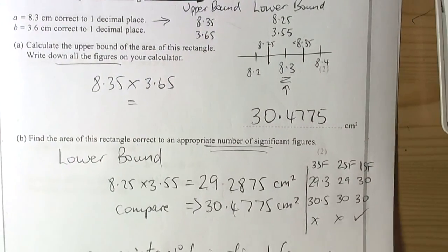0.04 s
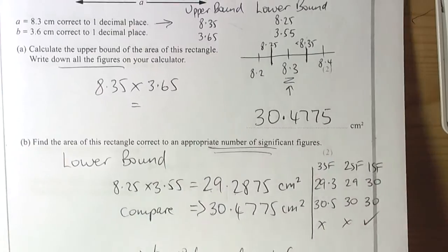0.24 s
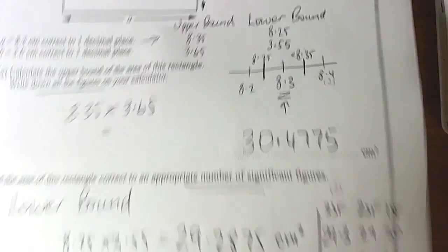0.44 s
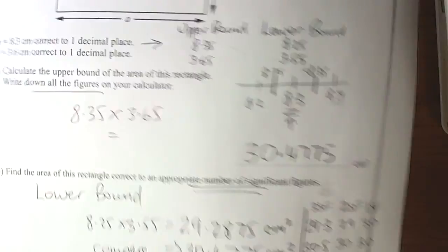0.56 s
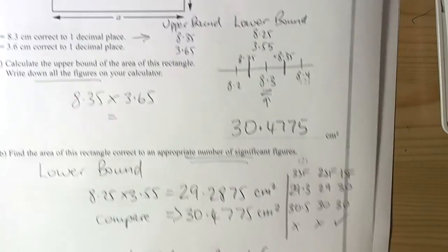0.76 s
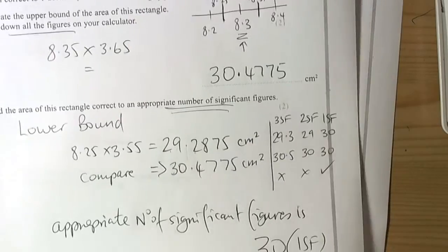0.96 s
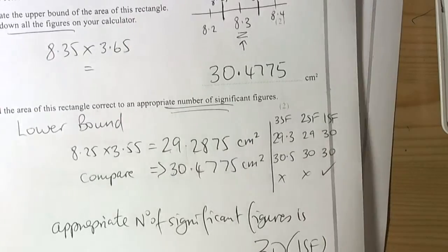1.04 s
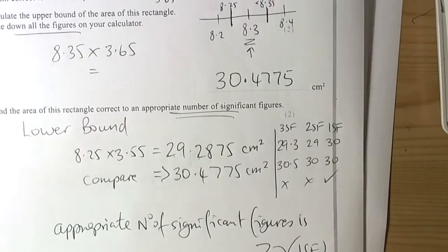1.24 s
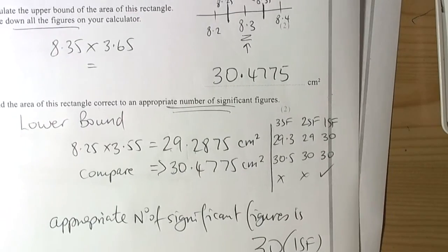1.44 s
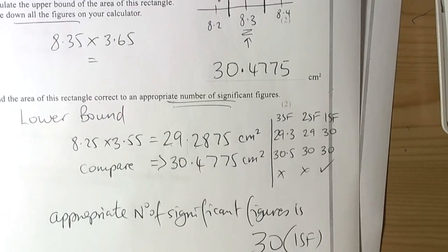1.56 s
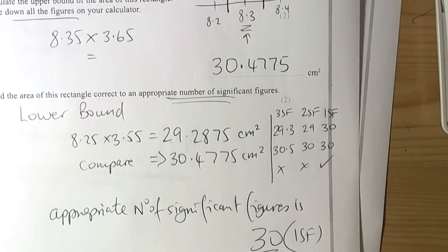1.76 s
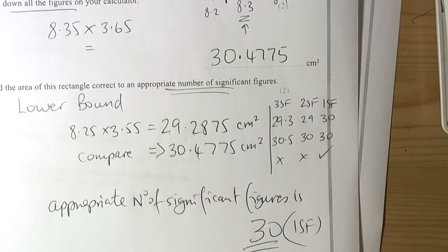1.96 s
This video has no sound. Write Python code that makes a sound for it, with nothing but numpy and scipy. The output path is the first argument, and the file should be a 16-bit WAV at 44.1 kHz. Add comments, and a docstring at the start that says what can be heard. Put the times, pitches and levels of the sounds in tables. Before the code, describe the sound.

A paper sheet is pushed across a wooden desk with a dry hiss, bows in a loud hollow crackle with sharp snaps, slides again and settles with soft bumps; close microphone, quiet small room.

```python
"""A sheet of paper is pushed up a wooden desk, close to a pair of microphones in a quiet room.
Its rub is tiny clicks over coloured noise. It bows with a crackle, a hollow ring and a few sharp
snaps, each an impulse and a fading run of clicks, then slides on and settles with soft low bumps.
Two faint brushes follow. A short room answer and a low room tone lie behind."""
import sys
import numpy as np
from scipy import signal
from scipy.fft import rfft, irfft, next_fast_len
from scipy.io import wavfile
from scipy.ndimage import map_coordinates

SR = 44100
rng = np.random.default_rng(int(sys.argv[2]) if len(sys.argv) > 2 else 0)


def store_wav(level_fs):
    """Save 16-bit WAV to argv[1]."""
    pcm = np.round(np.clip(np.atleast_2d(level_fs), -1, 1) * 32767)
    wavfile.write(sys.argv[1], SR, pcm.T.astype(np.int16))


N = 88200  # samples, 2 s

# The air pocket under the lifted sheet changes size as it moves.
# Each row: time in seconds, pitch in Hz, level of the hollow rustle in dB.
AIR_POCKET = [(.16, 1210, -73.5), (0.227, 950, -53), (.275, 1200, -76), (.35, 1100, -57.5),
              (.38, 1000, -66), (0.481, 1110, -23.5), (0.561, 1000, -33), (.595, 1100, -26.5),
              (.66, 1150, -41.5), (.72, 1150, -60.5)]
# Bright radiation of a crack in the sheet. Each row: frequency in Hz, relative level in dB per Hz.
CRACK_COLOUR = [(500, -58), (2200, -35.5), (3300, -1.5), (4000, 4), (4800, -2.5), (5700, -3.5),
                (6800, -11.5), (7800, -27.5)]


def amp(db):
    """Decibels to gain."""
    return 10 ** (np.asarray(db) / 20)


def unit(x):
    """Scale to rms 1."""
    return x / np.sqrt(np.mean(x ** 2) + 1e-20)


def along(points, hz):
    """Read (Hz, value) points on a log frequency axis."""
    point_hz, value = np.transpose(points)
    return np.interp(np.log(hz + 1), np.log(point_hz + 1), value)


def level(rows):
    """Gain per sample of a (seconds, dB) curve, falling by 1500 dB per second outside it."""
    s, db = np.transpose(rows)
    t = np.arange(N) / SR
    outside = np.maximum(s[0] - t, 0) + np.maximum(t - s[-1], 0)
    return amp(np.interp(t, s, db) - 1500 * outside)


def wobble(rate):
    """A smooth random curve with this many knots a second."""
    knots = rng.standard_normal(int(N * rate / SR) + 4)
    return map_coordinates(knots, [np.arange(N) * rate / SR])


def filtered(x, response):
    """Filter x by a complex response of frequency."""
    size = next_fast_len(N + SR // 2)
    spectrum = rfft(x, size) * response(np.fft.rfftfreq(size, 1 / SR))
    return irfft(spectrum, size)[..., :N]


def causal(colour, size=2048):
    """Minimum-phase impulse response of energy 1 with this colour: nothing sounds before its onset."""
    cepstrum = irfft(np.log(amp(along(colour, np.fft.rfftfreq(size, 1 / SR)))))
    cepstrum[1:size // 2] *= 2
    cepstrum[size // 2 + 1:] = 0
    h = irfft(np.exp(rfft(cepstrum)))
    return h / np.linalg.norm(h)


def add(out, s, sound, pan_db):
    """Place a sound at time s between left and right."""
    gain = amp(np.array([[pan_db], [-pan_db]]) / 2)
    out[:, round(s * SR):][:, :len(sound)] += gain * sound


def friction(stroke, colour, slips_per_s, grain_db, size_db, judder_db, pan_db):
    """Fibres catch and slip: tiny clicks over a smooth hiss, coloured by the sheet, with an unsteady grip."""
    happens = rng.random(N) < slips_per_s / SR
    sign = np.sign(rng.standard_normal(N))
    size = amp(size_db * np.minimum(rng.exponential(size=N), 4))
    slips = unit(happens * sign * size)
    force = rng.standard_normal(N) + amp(grain_db) * slips
    sound = unit(signal.fftconvolve(force, causal(colour))[:N])
    grip_and_pan = amp(judder_db * wobble(110) + pan_db * np.array([[.5], [-.5]]))
    return sound * level(stroke) * grip_and_pan


def shiver(fade, band):
    """One impulse and a fading run of tiny clicks, radiated through a band."""
    clicks_per_s, first_impulse = 4000, 5.5  # the first impulse is relative to the clicks' rms
    happens = rng.random(len(fade)) < clicks_per_s / SR
    clicks = unit(happens * np.sign(rng.standard_normal(len(fade))))
    clicks[0] = first_impulse
    ring = signal.fftconvolve(clicks * fade, band)[:len(fade)]
    return ring * np.linalg.norm(fade) / np.linalg.norm(ring)


def pocket(s, t, detune):
    """The short, soft-edged ring of the air pocket, at its pitch of time s."""
    attack_s, t60_s = .001, .012
    times, pitch_hz, _ = np.transpose(AIR_POCKET)
    hz = np.interp(s, times, pitch_hz) * np.exp(detune)
    rise = 1 - np.exp(-t / attack_s)
    return np.sin(2 * np.pi * hz * t) * rise * amp(-60 * t / t60_s)


def room_tone():
    """Low, steady background: noise mostly shared by both sides, weighted to the low end."""
    # Each row: frequency in Hz, relative level in dB per Hz.
    tone_colour = [(18, -63.5), (54, -33), (76, -14.5), (130, -1), (232, -4), (344, -12.5), (890, -21),
                   (1790, -19.5), (7740, -33), (10100, -71)]
    noise = rng.standard_normal(N) + 0.74 * rng.standard_normal((2, N))
    return amp(-68.5) * unit(filtered(noise, lambda hz: amp(along(tone_colour, hz))))


def room(x):
    """The short answer of the room: noise that dies at its own rate in each band, different on each side."""
    # Each row: frequency in Hz, time to fall by 60 dB in seconds.
    decay = [(150, 0.1), (1000, 0.032), (7000, 0.047)]
    hz, t, bands = signal.stft(rng.standard_normal((2, SR // 2)), SR, nperseg=256)
    fade = amp(-60 * t / along(decay, hz)[:, None])
    tail = signal.istft(bands * fade, SR, nperseg=256)[1]
    return signal.fftconvolve(x, tail / np.linalg.norm(tail[0]), axes=1)[:, :N]


def standing_waves(hz):
    """Resonant peaks and dips between desk, sheet and microphone, shared by every sound on the desk."""
    # Each row: centre in Hz, width in Hz, boost in dB (a dip where negative).
    peaks = [(370, 50, 4), (635, 20, 4), (780, 20, 4), (897, 25, 5), (983, 20, 6), (1107, 20, 7),
             (1259, 30, 4), (1335, 25, 5), (1529, 25, 4), (2007, 25, 5), (2085, 35, 5), (2305, 30, 4),
             (2600, 130, 3), (3300, 250, -3), (4250, 220, 3), (5620, 200, 3), (5980, 220, -4),
             (6380, 200, 3)]
    responses = []
    for centre, width, db in peaks:
        resonance = 1j * hz * width / (centre * centre - hz * hz + 1j * hz * width)
        responses.append(1 + (amp(db) - 1) * resonance)
    return np.prod(responses, axis=0)


def microphone_pair(hz):
    """Left and right response: the level difference varies with frequency, over the standing waves."""
    # Each row: frequency in Hz, left over right in dB.
    balance = [(60, 3), (130, 9), (180, 1.5), (260, 1), (380, 7.5), (1660, 7.5), (2410, -1.5), (3480, -5.5),
               (5040, 0.5)]
    return amp(np.array([[.5], [-.5]]) * along(balance, hz)) * standing_waves(hz)


def bumps():
    """Soft contacts of hand and sheet rock the desk for a few cycles."""
    # Each row: peak time in seconds, level in dB, pitch in Hz, half length (to 1/e) in seconds.
    contacts = [(0.736, -49.5, 135.8, 0.0116), (0.985, -58, 114, 0.01), (1.166, -53.5, 415, 0.0028),
                (1.204, -41, 105.7, 0.01), (1.202, -49, 185, 0.00428), (1.24, -56, 126.5, 0.0054),
                (1.416, -54, 232.8, 0.0046), (1.47, -61.5, 251, 0.018), (1.537, -60.5, 177, 0.008)]
    t = np.arange(N) / SR
    out = np.zeros(N)
    for s, db, hz, half in contacts:
        swell = np.exp(-((t - s) / half) ** 2)
        out += amp(db) * swell * np.cos(2 * np.pi * hz * (t - s))
    return out


def brushes():
    """Two faint, light rubs late on; a corner of the sheet catches briefly during the first."""
    # Strokes. Each row: time in seconds, level in dB.
    first, corner, last = [(1.34, -78.5), (1.365, -65.5), (1.42, -63), (1.54, -63.5), (1.61, -66),
                           (1.655, -75.5), (1.73, -91)], [(1.455, -76.5), (1.467, -51.5), (1.48, -62), (1.55, -77)], [(1.74, -86.5), (1.762, -86), (1.776, -73),
                                                         (1.826, -70.5), (1.868, -52), (1.944, -56),
                                                         (1.97, -68), (2.0, -70)]
    # Their colours. Each row: frequency in Hz, relative level in dB per Hz.
    first_colour, corner_colour = [(900, -14.5), (1800, -14.5), (2200, -6), (3200, -8), (3700, 0.5),
                                   (4300, -1.5), (5200, -1.5), (6500, -2), (7700, -11)], [(1000, -53), (3300, -17), (3800, 0.5), (4250, -10),
                                                         (5000, -24)]
    last_colour = [(1700, -22.5), (2550, -3.5), (3200, -11), (3700, -5), (4700, 2.5), (5800, 0),
                   (6500, 3.5), (7200, -5), (7800, -14.5)]
    return (friction(first, first_colour, slips_per_s=680, grain_db=-4, size_db=3.5,
                     judder_db=0.4, pan_db=-0.5)
            + friction(corner, corner_colour, slips_per_s=420, grain_db=1, size_db=9,
                       judder_db=1.5, pan_db=-1)
            + friction(last, last_colour, slips_per_s=1200, grain_db=-12.5, size_db=1,
                       judder_db=1.0, pan_db=0.0))


def ticks():
    """The edge flicks free: a small crack rings the sheet, higher the more it is bent, and the air pocket."""
    # Each row: start in seconds, level in dB, stiffness as a factor on the pitches of modes and crack,
    # tilt of the modes in dB per octave, air pocket in dB, crack in dB, left over right in dB.
    flicks = [(0.392, -39, 1.03, -2, 14.5, -7, -1.5), (0.7283, -33, 1.01, 1, 6, -4, -0.5),
              (.785, -23, 1, -1, -31.5, 10, 2), (0.8457, -34.5, 1.3, 2, 8, 6, -4)]
    # Modes of the sheet. Each row: pitch in Hz, level in dB, time to fall by 60 dB in seconds.
    modes = [(352, -10, 0.02), (1290, -8, .02), (1430, 0, .022), (2644, 1.5, 0.027), (3740, 3, .012),
             (4900, -4.5, 0.013)]
    t60_s, ring_db = 0.019, 6.5
    out, t = np.zeros((2, N + SR)), np.arange(SR // 6) / SR
    fade = amp(-60 * t / t60_s)
    for s, db, stiffness, tilt_db, pocket_db, crack_db, pan_db in flicks:
        sheet = np.zeros(len(t))
        for hz, mode_db, mode_t60 in modes:
            gain = amp(mode_db + tilt_db * np.log2(hz / 2000) - 60 * t / mode_t60)
            sheet += gain * np.cos(2 * np.pi * hz * stiffness * t)
        ring = amp(ring_db) * shiver(fade, sheet)
        crack = shiver(fade, causal([(hz * stiffness, band_db) for hz, band_db in CRACK_COLOUR]))
        tick = ring + amp(crack_db) * crack + amp(pocket_db) * pocket(s, t, 0)
        add(out, s, amp(db) * tick, pan_db)
    return out[:, :N]


def hollow():
    """Coarse slips at an uneven rate each ring the air pocket under the sheet."""
    slips_per_s, scatter, size_db = 230, .14, 2  # scatter: spread of the log of the pitch
    out, t = np.zeros((2, N + SR)), np.arange(SR // 20) / SR
    count = N * slips_per_s // SR
    times = (np.arange(count) + rng.random(count)) / slips_per_s
    for s, (detune, size) in zip(times, rng.standard_normal((count, 2))):
        add(out, s, amp(size_db * size) * pocket(s, t, scatter * detune), pan_db=-1.0)
    return unit(out[:, :N]) * level([(s, db) for s, _, db in AIR_POCKET])


def snaps():
    """Each buckle is a sharp impulse and a quickly dying run of tiny clicks, radiated in four bands."""
    # Each row: start in seconds, level in dB, low thud in dB, hollow pop in dB, bright crack in dB,
    # time to fall by 60 dB in seconds, left over right in dB.
    buckles = [(0.4225, -19.5, -20, -5.5, 2, 0.0069, -0.5), (0.4246, -18, -13, 0.5, 5.5, 0.031, -2),
               (0.4930, -15, -14, 9, 0, 0.014, -2), (0.4959, -17, -18.5, -3.5, 8.5, 0.031, 0.5),
               (0.5022, -26, -12.5, -0.5, 8, 0.043, 0.5), (.579, -24.5, -14, -7.5, 7, 0.0075, -0.5),
               (0.5888, -31.5, -19, -2, 8.5, 0.028, -0.5), (0.6278, -7.5, -24, -2.5, -7.5, 0.004, -1),
               (0.6303, -16.5, -21.5, -12, -1.5, 0.014, -3.5), (0.6338, -19.5, -31, -4, -3.5, 0.031, -2),
               (0.652, -39, -14.5, 12, -7.5, 0.025, -5.5), (0.687, -42.5, -14, 11.5, -6.5, 0.03, -6)]
    # Colours of the bands. Each row: frequency in Hz, relative level in dB per Hz.
    thud, pop, flick = [(40, -51), (110, -13.5), (190, -7), (330, -0.5), (480, -6.5), (700, -15),
                        (1500, -39.5)], [(50, -59.5), (200, -38.5), (600, -20), (850, -5.5), (1100, -2),
                                      (1400, 0), (1750, -5.5), (2200, -12), (3000, -46)], [(200, -58), (900, -28), (1600, -11.5), (2100, 3),
                                                   (2700, -5), (3300, -2), (4500, -26.5)]
    tail_db, tail_t60_s = -22.5, 0.26
    out, t = np.zeros((2, N + SR)), np.arange(SR // 6) / SR
    bands = [causal(colour) for colour in (thud, pop, flick, CRACK_COLOUR)]
    for s, db, thud_db, pop_db, crack_db, t60, pan_db in buckles:
        fade = amp(-60 * t / t60) + amp(tail_db - 60 * t / tail_t60_s)
        band_levels = (thud_db, pop_db, 0, crack_db)
        snap = sum(amp(band_db) * shiver(fade, band) for band, band_db in zip(bands, band_levels))
        add(out, s, amp(db) * snap, pan_db)
    return out[:, :N]


def bowing():
    """The lifted sheet flexes in an uneven, clumped crackle."""
    # Each row: time in seconds, level in dB before the trim below.
    flexing = [(.375, -58.5), (.397, -42.5), (.415, -45.5), (.445, -33.5), (.485, -23), (.53, -23),
               (.558, -32.5), (.594, -25), (.615, -30.5), (.652, -35.5), (.692, -45.5), (.715, -48.5),
               (.755, -61)]
    # Each row: frequency in Hz, relative level in dB per Hz.
    colour = [(30, -40), (90, -19.5), (380, -10.5), (460, -10.5), (750, -2), (1150, -2), (1750, -4.5),
              (2150, -1.5), (2650, -10.5), (3050, -13), (4300, -15), (6000, -27.5), (6800, -21),
              (7750, -28.5)]
    return amp(-3) * friction(flexing, colour, slips_per_s=700, grain_db=1.5, size_db=2.5,
                              judder_db=2.2, pan_db=-1.5)


def slides():
    """The sheet rubs over the desk: a push with a mid-range rasp, a skim as it bows, a drag, a settling."""
    # Strokes. Each row: time in seconds, level in dB (the push before its trim below).
    push, rasp, skim = [(.02, -71.5), (.066, -61), (.076, -47), (.122, -52), (.134, -45.5), (.152, -47),
                        (.214, -24.5), (.265, -25.5), (.31, -30), (.36, -34), (.37, -51.5), (.385, -56.5)], [(.07, -69), (.09, -62), (.135, -50), (.15, -54), (.226, -37.5),
                                      (.27, -43), (.33, -36.5), (.36, -40), (.372, -56.5)], [(.375, -51), (.4, -41), (.46, -34.5), (.53, -35),
                                                    (.565, -38.5), (.612, -69), (.65, -46.5), (.735, -44.5),
                                                    (.825, -36), (.875, -41), (.915, -37), (.96, -43),
                                                    (1.0, -68)]
    drag, settle = [(.92, -44), (.95, -37.5), (.985, -31), (1.06, -32.5), (1.092, -34.5), (1.11, -27.5),
                    (1.145, -28.5), (1.165, -36), (1.198, -39), (1.23, -83)], [(1.1, -63), (1.15, -42.5), (1.2, -41.5), (1.235, -43.5), (1.258, -50.5),
                                  (1.28, -47), (1.305, -58.5), (1.34, -79.5)]
    # Their colours. Each row: frequency in Hz, relative level in dB per Hz.
    push_colour, rasp_colour, skim_colour = [(50, -53.5), (200, -30), (370, -21.5), (600, -50), (1500, -33),
                                             (2700, -19), (3700, 1), (4800, 2), (5700, -0.5), (7400, -7),
                                             (7800, -17.5)], [(650, -43), (900, -9.5), (1250, -13),
                                                                  (1420, -4.5), (1650, -5.5), (2300, 1),
                                                                  (2700, -1.5), (3400, 5), (4500, -25)], [(500, -58.5),
                                                                                       (1000, -33.5),
                                                                                       (1800, -26.5),
                                                                                       (2250, -20.5),
                                                                                       (2600, -7.5),
                                                                                       (3700, -1),
                                                                                       (4500, -0.5),
                                                                                       (6400, -2.5),
                                                                                       (7750, -16.5)]
    drag_colour, settle_colour = [(150, -55), (350, -53), (700, -47.5), (978, -36), (1230, -37),
                                  (1440, -20), (1870, -20.5), (2060, -8.5), (2490, -16.5), (3180, -4.5),
                                  (4360, -1), (5640, 0), (7740, -17)], [(700, -18.5), (1000, -15), (1600, -28),
                                                       (2100, -10.5), (3200, -11.5), (4700, -0.5),
                                                       (6200, -0.5), (7300, 8.5), (7900, -1)]
    return (amp(-1.5) * friction(push, push_colour, slips_per_s=820, grain_db=-9, size_db=5.5,
                                 judder_db=1.48, pan_db=-3.5)
            + friction(rasp, rasp_colour, slips_per_s=900, grain_db=-3.5, size_db=-0.5,
                       judder_db=2, pan_db=-2.5)
            + friction(skim, skim_colour, slips_per_s=960, grain_db=-9.5, size_db=4.0,
                       judder_db=1.5, pan_db=-0.5)
            + friction(drag, drag_colour, slips_per_s=1500, grain_db=-3.5, size_db=2,
                       judder_db=0.98, pan_db=-2.0)
            + friction(settle, settle_colour, slips_per_s=1900, grain_db=-8, size_db=-0.5,
                       judder_db=2.0, pan_db=-1))


def scene():
    """Paper and desk as the two microphones hear them, in the room."""
    on_desk = slides() + brushes() + bowing() + hollow() + snaps() + ticks() + bumps()
    paper = filtered(on_desk, microphone_pair)
    return paper + amp(-17.5) * room(paper) + room_tone()


def record(dry):
    """A narrow-band recorder: a steep treble cut, then overload clips the peaks beyond full scale."""
    band_hz, full_scale, top_hz = 7900, .95, 18000
    narrow = filtered(dry, lambda hz: 1 / np.sqrt(1 + (hz / band_hz) ** 140))
    clipped = np.clip(narrow, -full_scale, full_scale)
    return filtered(clipped, lambda hz: hz < top_hz)


dry = scene()
out = record(dry)
store_wav(out)
```